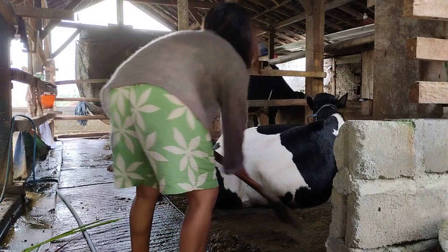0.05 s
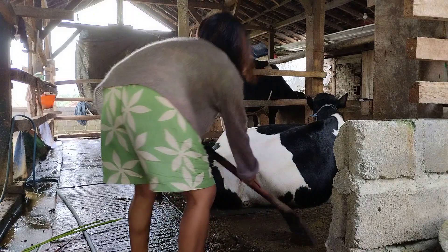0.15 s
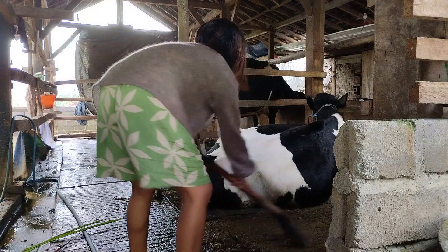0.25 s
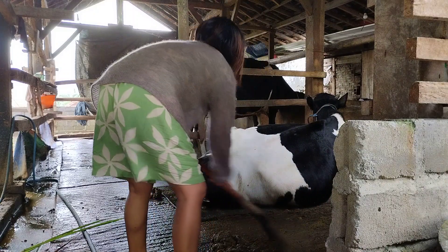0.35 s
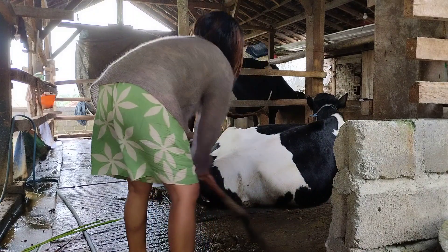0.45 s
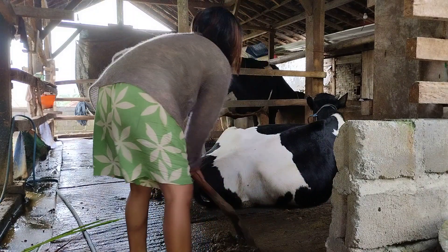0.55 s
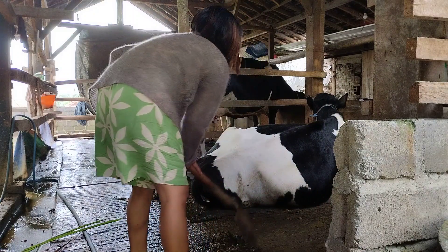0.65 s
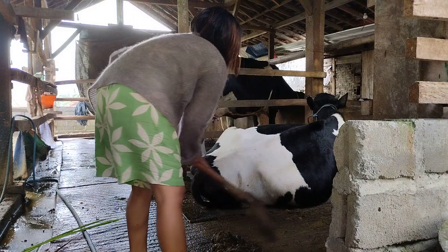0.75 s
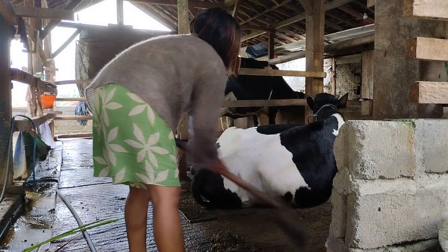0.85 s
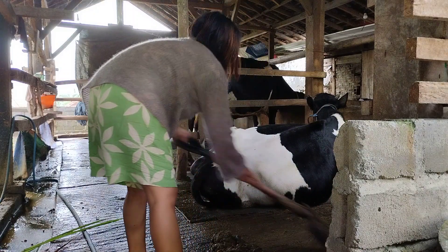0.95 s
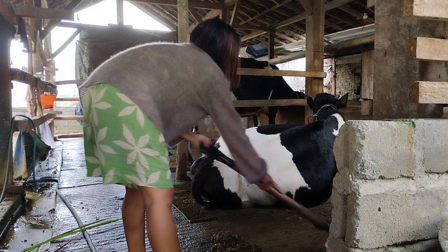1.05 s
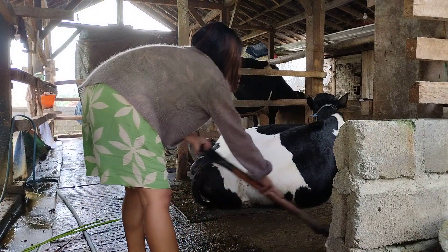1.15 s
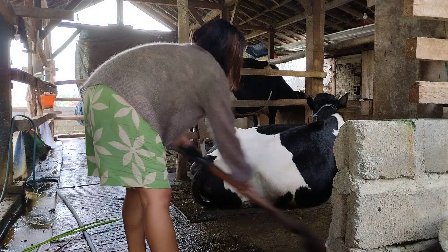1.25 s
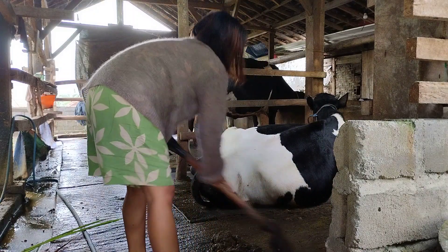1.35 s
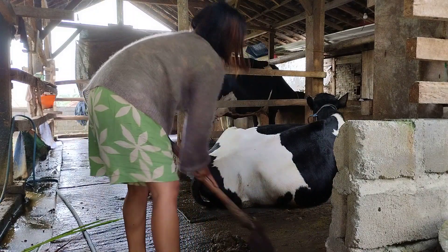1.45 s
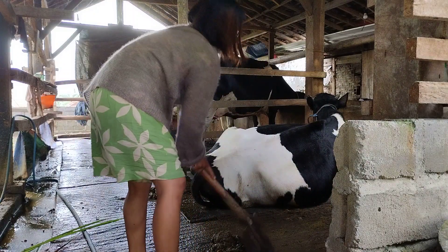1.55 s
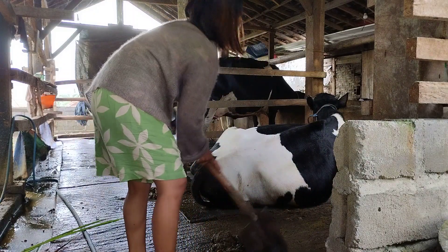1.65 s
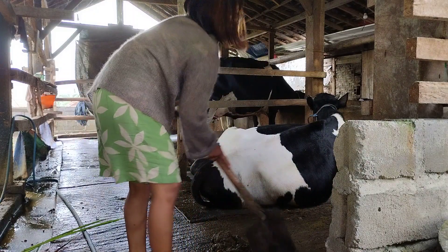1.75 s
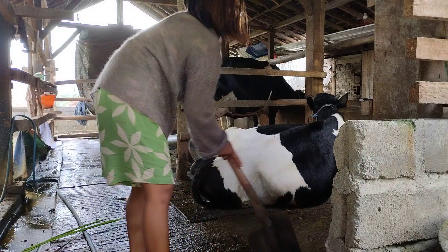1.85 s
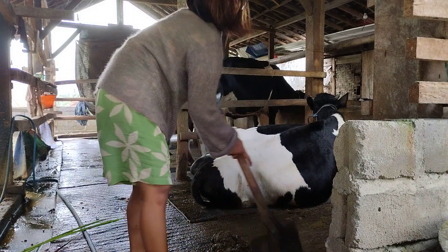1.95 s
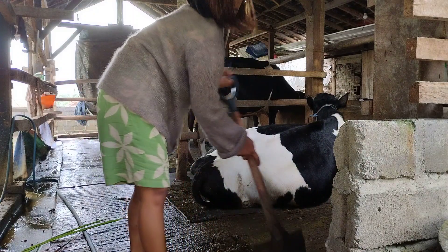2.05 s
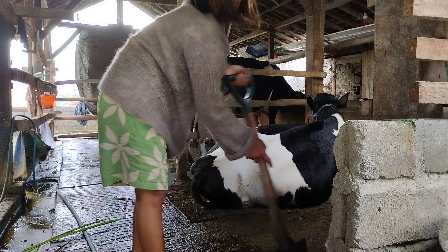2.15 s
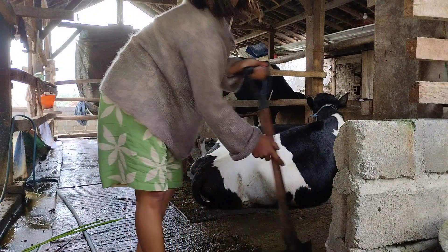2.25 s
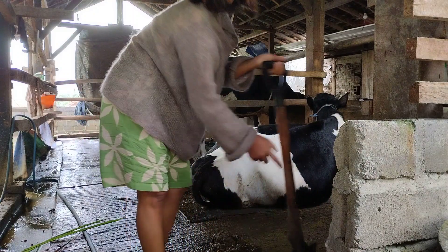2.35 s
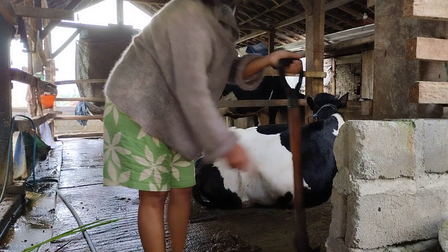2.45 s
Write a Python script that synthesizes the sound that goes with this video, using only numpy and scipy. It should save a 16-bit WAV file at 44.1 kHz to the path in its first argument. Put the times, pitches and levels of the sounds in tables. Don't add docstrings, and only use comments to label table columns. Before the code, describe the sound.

Metal shovel blade grinding over wet gritty concrete in two short strokes, ending with a knock

```python
import sys
import numpy as np
from scipy import signal
from scipy.fft import rfft, irfft, next_fast_len
from scipy.io import wavfile
from scipy.ndimage import uniform_filter1d, map_coordinates

SR = 44100
rng = np.random.default_rng(int(sys.argv[2]) if len(sys.argv) > 2 else 0)


def ratio_of_db(decibels):
    return 10 ** (np.asarray(decibels, float) / 20)


def unload_audio(sound):
    columns = np.transpose(np.atleast_2d(sound))
    steps = np.round(np.clip(columns, -1, 1) * 32767)
    wavfile.write(sys.argv[1], SR, steps.astype(np.int16))


N = 112455
TIME = np.arange(N) / SR


def unit(x):
    return x / np.sqrt(np.mean(x ** 2) + 1e-20)


def along(points, hz):
    f, value = np.transpose(points)
    return np.interp(np.log(hz + 1), np.log(f + 1), value)


def wobble(rate):
    knots = rng.standard_normal(int(N * rate / SR) + 4)
    return map_coordinates(knots, [TIME * rate])


def bump(start, length):
    return np.sin(np.pi * np.clip((TIME - start) / length, 0, 1))


def filtered(x, response):
    m = next_fast_len(len(x) + 8192)
    return irfft(rfft(x, m) * response(np.fft.rfftfreq(m, 1 / SR)), m)[:len(x)]


def coloured(x, spectrum):
    return filtered(x, lambda f: ratio_of_db(along(spectrum, f)))


def highpass(x, hz, order=1):
    return filtered(x, lambda f: (1j * f / (hz + 1j * f)) ** order)


def grains(rate, spread_db):
    hit = rng.random(N) < rate / SR
    size = ratio_of_db(spread_db * np.minimum(rng.exponential(size=N), 3))
    return unit(hit * rng.standard_normal(N) * size)


def patchy(x, depth_db, count_hz, count_s):
    z = signal.stft(x, nperseg=256)[2]
    field = uniform_filter1d(rng.standard_normal(z.shape), count_hz, 0)
    field = uniform_filter1d(field, count_s, 1)
    return signal.istft(z * ratio_of_db(depth_db * unit(field)), nperseg=256)[1][:N]


# f/Hz, level/dB per Hz
AIR = [(110, -42), (160, 1), (300, -7.5), (1100, -11), (2400, -13), (4600, -16.5), (6300, -11.5),
       (8900, -12), (11500, -19.5), (15800, -26.5)]


def shed_air():
    level = ratio_of_db(-60.5 + 0.63 * wobble(3.1))
    noise = patchy(rng.standard_normal(N), 1.6, count_hz=5, count_s=20)
    return level * unit(coloured(noise, AIR))


# f/Hz, level/dB per Hz
RUMBLE = [(12, -53), (20, 3), (86, -6.5), (118, -0.5), (156, -27), (220, -17), (290, -59), (480, -120)]


def rumble():
    level = ratio_of_db(-57 + 2.6 * wobble(8.43))
    return level * unit(coloured(rng.standard_normal(N), RUMBLE))


def hum():
    level = ratio_of_db(-65.5 + 0.54 * wobble(7.7))
    return level * np.sin(2 * np.pi * 110.44 * TIME + 0.44 * wobble(8.02))


# t/s, length/s, level/dB, f/Hz
RAILS = [(.62, .085, -70, 11448), (.61, .15, -69, 6322), (.84, .13, -71, 5880), (.8, .2, -77, 6322),
         (.83, .05, -77, 10900), (.91, .07, -74, 3150), (1.08, .05, -77, 4600), (1.18, .1, -70, 5880),
         (1.22, .06, -72, 11448), (1.85, .21, -70, 6322), (1.85, .13, -75, 2267), (1.85, .05, -78, 10900),
         (1.86, .05, -79, 11448), (2.285, .035, -69, 4800)]


def rails():
    out = np.zeros(N)
    for s, length, db, hz in RAILS:
        level = ratio_of_db(db + 6.5 + 2.7 * wobble(41.55)) * bump(s, length) ** 0.4
        out += level * np.sin(2 * np.pi * hz * TIME + 0.43 * wobble(120))
    return out


# centre t/s, length/s, level/dB
PUSHES = [(0.243, 0.015, -31.5), (0.267, 0.011, -29), (0.419, 0.033, -31), (1.1487, 0.011, -34.5),
          (1.662, 0.033, -42.5), (2.061, 0.027, -37)]


def air_pushes():
    out = np.zeros(N)
    for s, length, db in PUSHES:
        out -= ratio_of_db(db) * bump(s - length / 2, length) ** 2
    return highpass(out, 25)


# t/s, peak level/dB, level of the dull part/dB
TICKS = [(.0044, -36, -9), (0.036, -41, -8), (0.0697, -35, -4), (.092, -38, -9), (0.159, -49, -2),
         (0.173, -34.5, -9), (.195, -47, -20), (.694, -33.5, -8), (.7761, -35, -5), (0.846, -44, -9),
         (0.923, -45, -10), (.943, -42, -12), (0.984, -38, -12), (1.043, -28, -9), (1.108, -37.5, -2.5),
         (1.151, -44, -15), (1.655, -37, -22), (1.71, -32, -12.5), (1.73, -36.5, -3), (1.7726, -34, -12),
         (1.8033, -31, -8.5), (1.811, -29, -13), (1.849, -32.5, -3.5), (1.907, -34.5, -7),
         (1.975, -41, -1.5), (2.041, -40, -2), (2.0636, -40.5, -4), (2.101, -29.5, -9.5), (2.154, -37, -2),
         (2.158, -39, -4), (2.1675, -34, -1), (2.1891, -39, -14), (2.276, -23.5, -11), (2.328, -29, -5.5),
         (2.3457, -36, -7), (2.3756, -38, -6.5), (2.401, -37, -4), (2.496, -35, -13)]
# f/Hz, level/dB
TICK = [(2500, -120), (3500, -4.5), (6000, -5), (9000, 8), (12000, -9), (15800, -17)]
# f/Hz, level/dB
PLOP = [(300, -120), (700, 7), (1800, 3), (3500, -1.5), (5000, -120)]
# t/s, length/s, level/dB
SQUELCH = [(1.643, 0.047, -6.5), (1.697, 0.049, -5.5), (1.756, 0.081, 2), (2.031, 0.052, -3),
           (2.094, .035, 1), (2.148, 0.026, -11), (2.272, 0.1, -5)]


def crumbs():
    snap_t60_s, plop_t60_s = 0.0066, 0.013
    out, t = np.zeros(N + 4096), np.arange(4096) / SR
    for s, db, dull_db in TICKS:
        snap = unit(coloured(rng.standard_normal(len(t)), TICK)) * ratio_of_db(-10 - 60 * t / snap_t60_s)
        plop = unit(coloured(rng.standard_normal(len(t)), PLOP)) * ratio_of_db(-7 + dull_db - 60 * t / plop_t60_s)
        out[round(s * SR):][:len(t)] += ratio_of_db(db) * (snap + plop)
    clumps = 0.19 + sum(ratio_of_db(db) * bump(s, length) for s, length, db in SQUELCH)
    crackle_per_s, crackle_db = 500, -58
    bright = unit(coloured(grains(crackle_per_s, 1.5), TICK))
    dull = unit(coloured(grains(crackle_per_s, 2.4), PLOP))
    return out[:N] + ratio_of_db(crackle_db) * clumps * (bright + 0.47 * dull)


# f/Hz, width/Hz, level/dB
BLADE = [(105.4, 34.3, -13), (159.6, 52, -13.5), (204.4, 14, -7), (290, 23, -8), (358, 15.3, -4),
         (463.6, 47, -6), (529.7, 29.5, 1.5), (647, 53.7, -7.5), (878, 98, -10.5), (1155, 166, -13.5),
         (1570, 165, -15), (1910, 290, -25.5)]


def blade(x, pitch, damp):
    def response(f):
        total = 0
        for k, (centre, width, db) in enumerate(BLADE):
            loss = 1j * f * width * damp
            total = total + (-1) ** k * ratio_of_db(db) * loss / ((centre * pitch) ** 2 - f * f + loss)
        return total
    return filtered(x, response)


# t/s, peak level/dB, thud f/Hz, crack level/dB
BLOWS = [(.238, -18.5, 423, -18), (.2382, -22, 786, -22), (.2525, -18.5, 645, -19),
         (0.2603, -20.5, 620, -41), (0.29, -26, 440, -17), (.349, -24.5, 856, -36), (.356, -15.5, 837, -30),
         (.363, -20, 830, -26), (.372, -21, 520, -36), (.459, -16.5, 503, -30), (0.508, -17, 486, -34),
         (.536, -16.5, 495, -33), (.553, -28, 555, -28), (.567, -21, 524, -38), (.594, -22, 556, -23),
         (.61, -25.5, 552, -45), (.635, -23.5, 533, -23), (1.1728, -19, 570, -22), (1.1815, -21, 608, -16),
         (1.19, -22.5, 395, -19), (1.297, -27.5, 600, -3.5), (1.31, -16, 594, -20), (1.368, -23, 606, -27),
         (1.395, -23, 617, -16), (1.41, -21.5, 597, -25), (1.42, -16.5, 900, -16.5),
         (1.428, -17.5, 573, -20), (1.444, -28, 660, -25), (1.47, -21.5, 465, -11), (1.48, -24, 744, -25),
         (1.518, -20, 620, -39), (1.552, -25, 523, -24), (2.229, -14, 747, -20), (2.2315, -22, 207.5, -36),
         (2.236, -18, 900, -42), (2.2414, -23.5, 780, -36), (2.254, -30, 620, -34), (2.262, -31, 290, -32),
         (2.275, -32, 540, -30), (2.2835, -24.5, 560, -25.5)]
# f/Hz, level/dB per Hz
GRIT = [(1180, -3), (2000, -3), (2680, -5.5), (2930, -9), (5900, -15), (8930, -6.5), (12700, -16.5),
        (15800, -24)]


def blows():
    thud_cycles, contact_s, crack_t60_s = 13.5, 0.00024, 0.1
    out, t = np.zeros(N), np.arange(SR // 4) / SR
    for s, db, hz, crack_db in BLOWS:
        hold = sum(s > rows[-1][0] for rows in STROKES)
        tone = np.sin(2 * np.pi * hz * t) + ratio_of_db(-10) * np.sin(2 * np.pi * 1.667 * hz * t)
        thud = tone * ratio_of_db(-60 * t * hz / thud_cycles) * (1 - np.exp(-t / contact_s))
        _, pitch, damp = HOLDS[hold]
        ring = blade(t * np.exp(-t / contact_s * 2), pitch, damp)
        crack = unit(coloured(rng.standard_normal(len(t)), GRIT)) * ratio_of_db(crack_db - 60 * t / crack_t60_s)
        sign = 1 if hold == 3 else -1
        hit = crack + sign * thud / thud.max() + ratio_of_db(-9.5) * ring / np.abs(ring).max()
        out[round(s * SR):][:len(t)] += ratio_of_db(db) * hit
    return highpass(out, 120)


# t/s, pressure level/dB, grit level over pressure/dB
STROKES = [
    [(.25, -36, -19), (.28, -35.5, -17), (.315, -34.5, -7.5), (.34, -32.5, -5), (.375, -30, -5.5),
     (.446, -27, -8), (.52, -31.5, -4.5), (.6, -35.5, -7.5), (.655, -41.5, -21)],
    [(1.195, -32, -14), (1.22, -34.5, -21.5), (1.255, -43, -7.5), (1.28, -32.5, -14.5), (1.296, -33, -12)],
    [(1.298, -32, 0), (1.322, -32.5, -2), (1.352, -35, -4.5), (1.39, -25, -10.5), (1.425, -24.5, -8.5),
     (1.462, -29, -8.5), (1.49, -27.5, -10.5), (1.555, -36.5, -8), (1.575, -40, -18)],
    [(2.245, -44, -26), (2.27, -36, -18), (2.288, -48, -18)],
]
HOLDS = [(.98, 1.01, 1.3), (1.1, 1, 2.4), (1.2, 1, 2.2), (1.35, 1.25, 4)]
# f/Hz, level/dB per Hz
GRIT_FIRST = [(1180, -36), (2000, 1.5), (2340, -3.5), (2550, 0.5), (2930, -6.5), (5180, -13), (9490, -1),
              (15800, -18)]
# t/s, length/s, level/dB
BURSTS = [(.322, .025, 2.5), (0.351, .012, 0), (0.404, 0.0095, 2.5), (0.428, 0.025, 5.5), (0.517, .012, 4),
          (0.552, .012, 1), (1.302, 0.043, 1), (1.387, 0.014, 0), (1.415, 0.011, -4), (1.542, 0.017, 4.5)]


def scrape():
    lift_db_per_s, upper_hz = 898, 900
    out = np.zeros(N)
    bursts_db = sum(db * bump(s, length) for s, length, db in BURSTS)
    for stroke, rows in enumerate(STROKES):
        s, press_db, grit_db = np.transpose(rows)
        first, last, damp = HOLDS[stroke]
        on = (TIME > s[0]) * ratio_of_db(-lift_db_per_s * np.maximum(TIME - s[-1], 0))
        force = on * ratio_of_db(np.interp(TIME, s, press_db))
        speed_db = np.interp(TIME, s, grit_db)
        judder = wobble(45)

        slips = grains(5000, 1)
        drive = slips * force * ratio_of_db(0.67 * judder) / np.std(blade(slips, first, damp))
        turn = np.pi / 2 * np.clip((TIME - s[0]) / (s[-1] - s[0]), 0, 1)
        body = blade(drive * np.cos(turn), first, damp) + blade(drive * np.sin(turn), last, damp)
        upper = filtered(body, lambda f: 1 / (1 + (upper_hz / (f + 1)) ** 4))
        dulling_db = 0.85 * (np.minimum(speed_db, -6) + 4)
        out += body - upper + upper * ratio_of_db(dulling_db)

        grit = patchy(grains(11000, 1.8), 1.5, count_hz=14, count_s=5)
        grit = unit(coloured(grit, GRIT if stroke else GRIT_FIRST))
        grit_judder_db = 0.54 * (.5 * judder + wobble(160))
        out += grit * force * ratio_of_db(2.5 + speed_db + bursts_db + grit_judder_db)
    return highpass(out, 45, order=2)


# f/Hz, t60/s
SHED = [(150, 0.27), (600, 0.44), (2000, 0.28), (9000, 0.35)]


def shed(x):
    out, step = np.zeros(N + SR), SR // 5
    for k in range(0, N, step):
        hz, t, z = signal.stft(rng.standard_normal(SR // 2), SR, nperseg=256)
        decay = ratio_of_db(-60 * t / along(SHED, hz)[:, None])
        tail = signal.istft(z * decay, SR, nperseg=256)[1]
        wet = signal.fftconvolve(x[k:k + step], tail / np.linalg.norm(tail))
        out[k + 200:][:len(wet)] += wet
    return out[:N]


def scene():
    background = shed_air() + rumble() + hum() + rails() + air_pushes()
    near = crumbs() + blows() + scrape()
    return (near + ratio_of_db(-9) * shed(near) + background)[None]


def low_pass(x):
    return signal.sosfilt(signal.butter(12, 16365, fs=SR, output="sos"), x)


def record(dry):
    top_hz = 15850
    mix = filtered(dry[0], lambda f: np.where(f < top_hz, 1, .03))[None]
    return low_pass(mix)


dry = scene()
out = record(dry)
unload_audio(out)
```